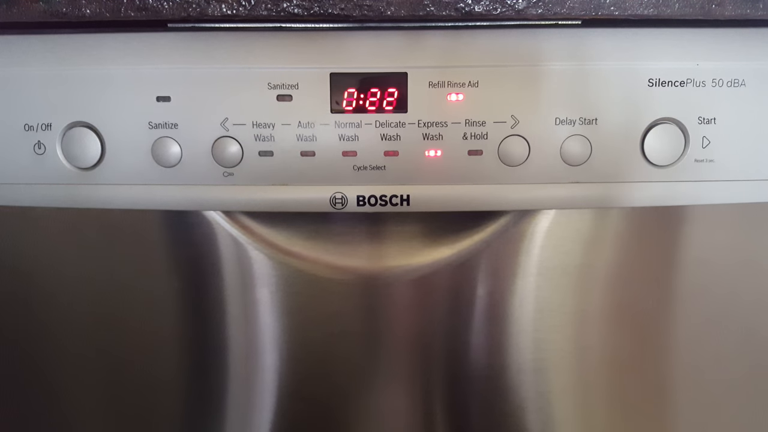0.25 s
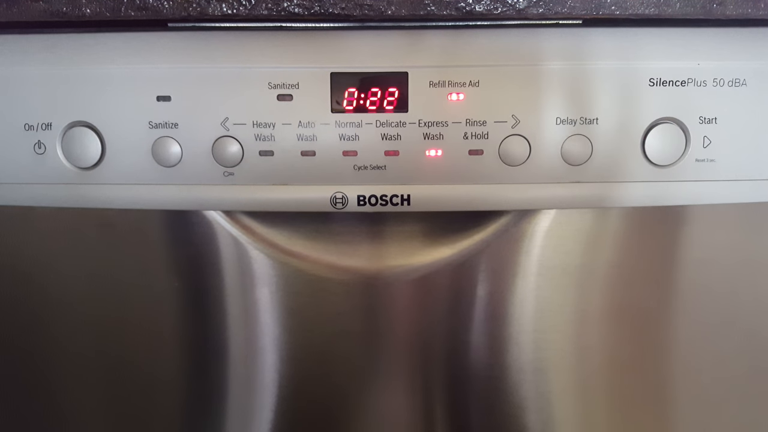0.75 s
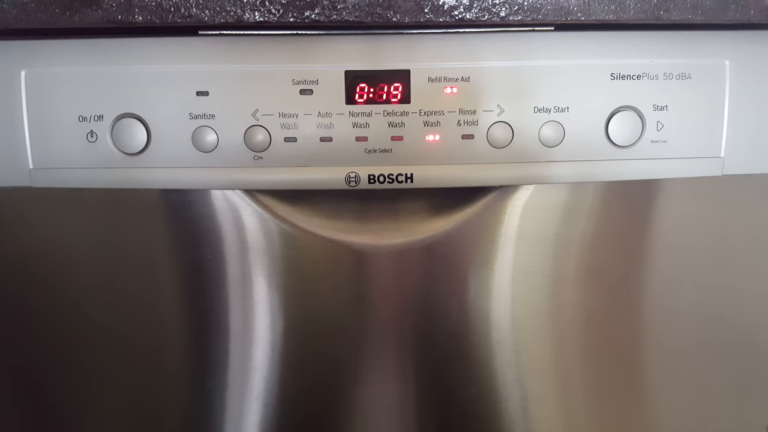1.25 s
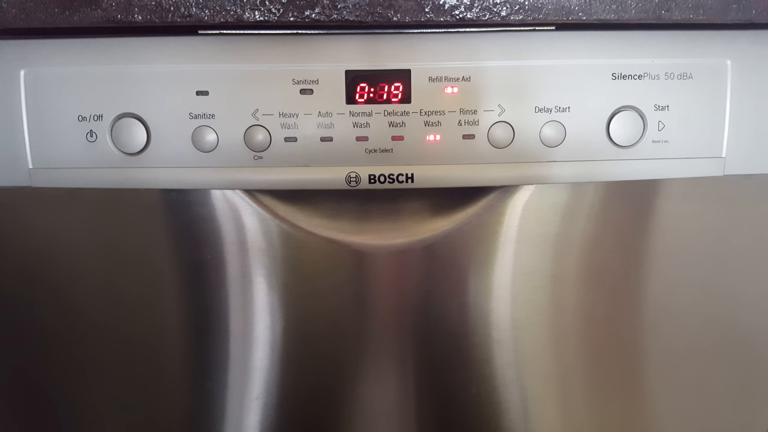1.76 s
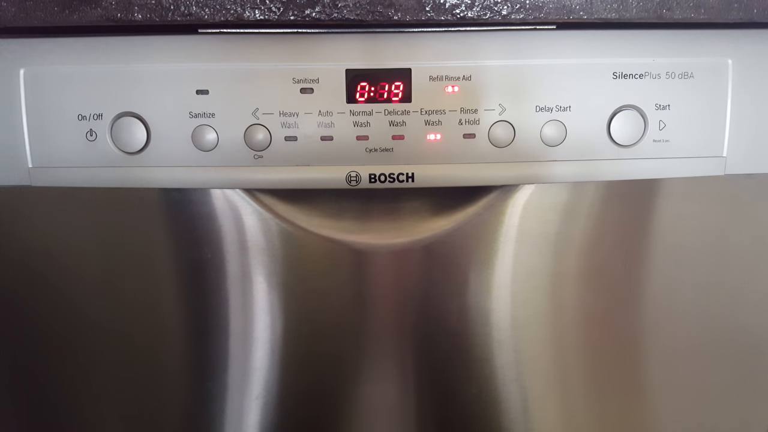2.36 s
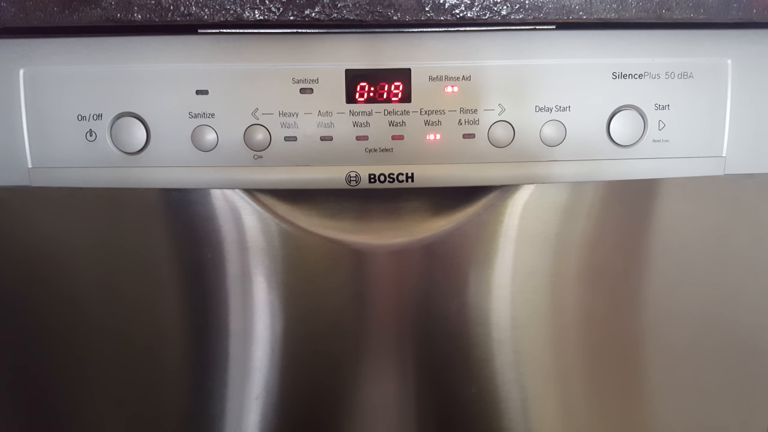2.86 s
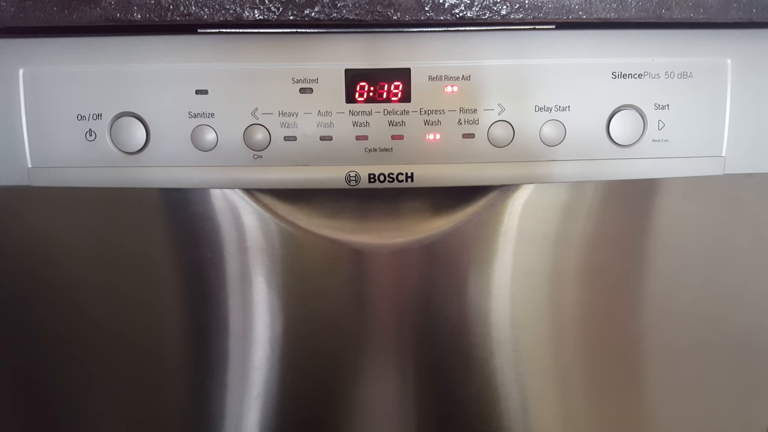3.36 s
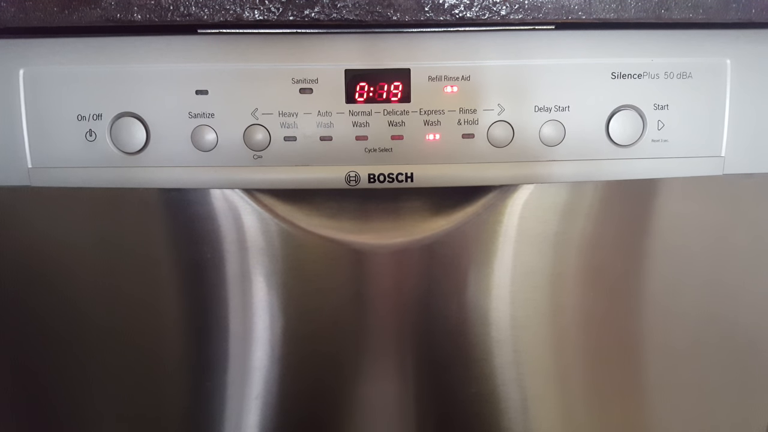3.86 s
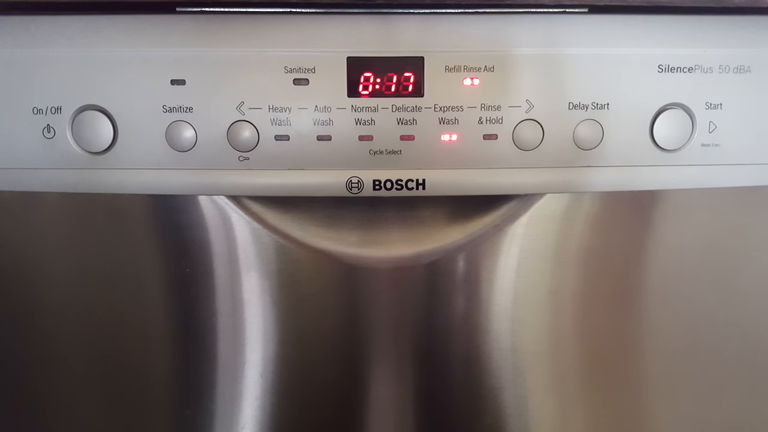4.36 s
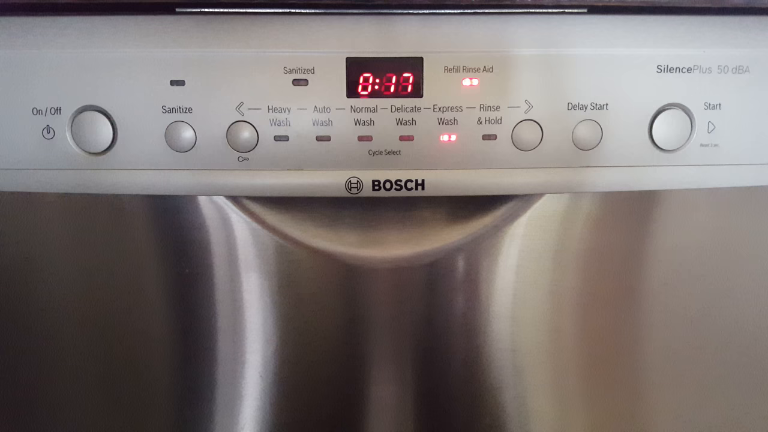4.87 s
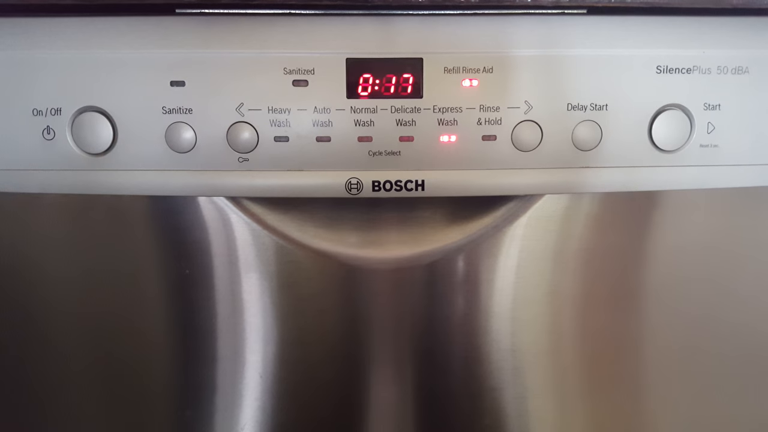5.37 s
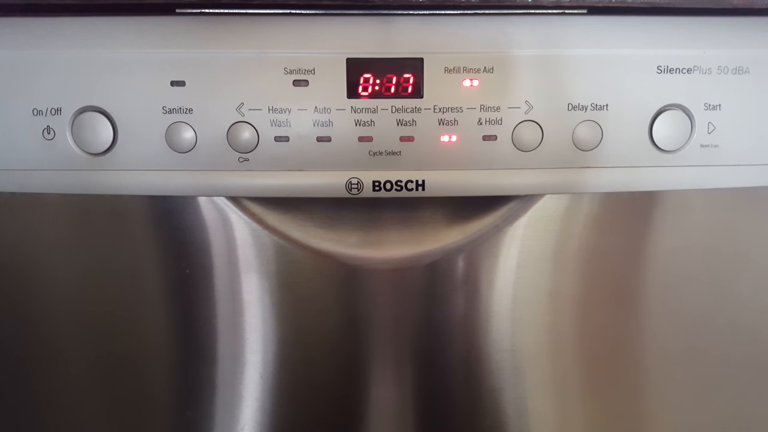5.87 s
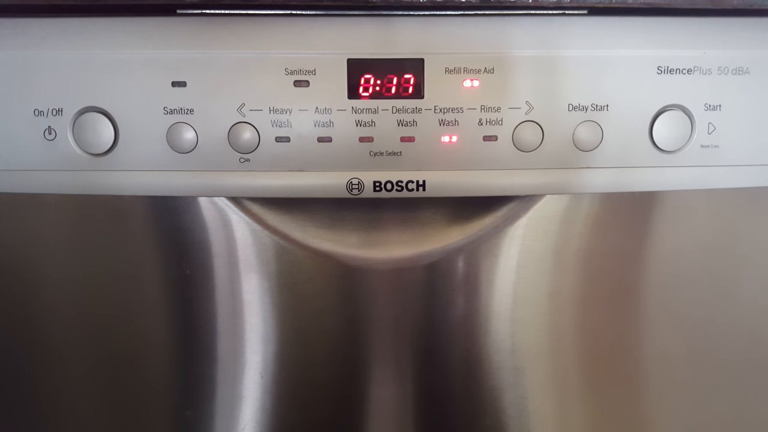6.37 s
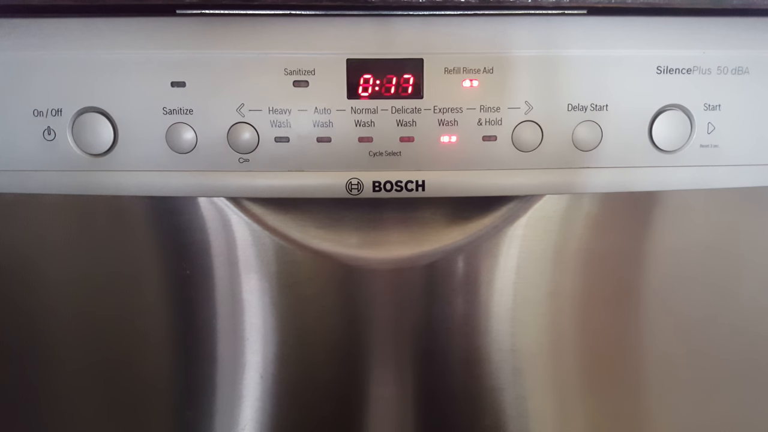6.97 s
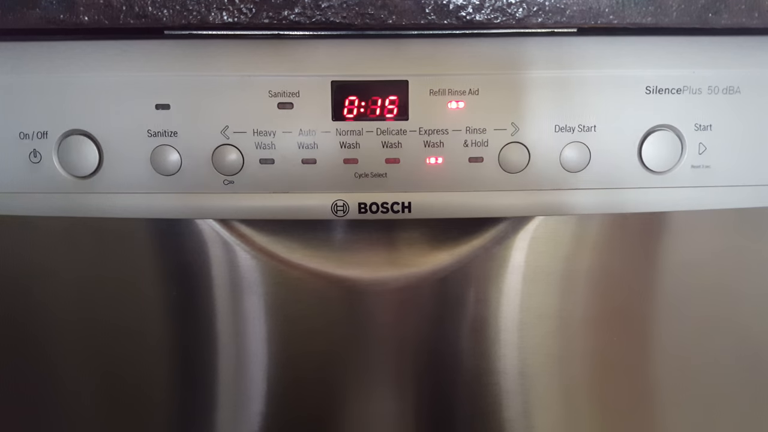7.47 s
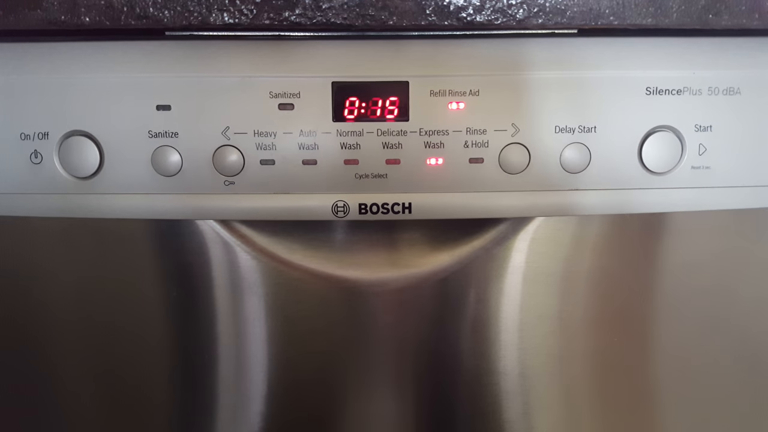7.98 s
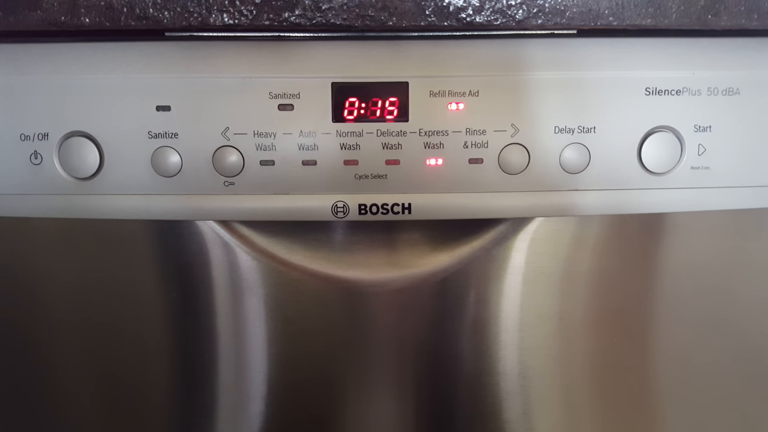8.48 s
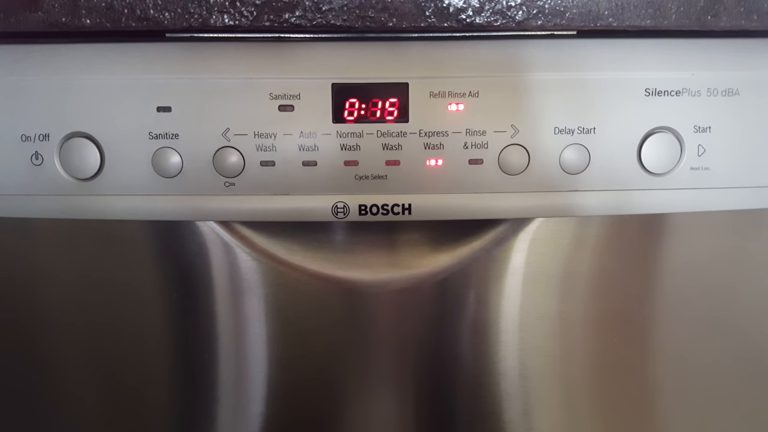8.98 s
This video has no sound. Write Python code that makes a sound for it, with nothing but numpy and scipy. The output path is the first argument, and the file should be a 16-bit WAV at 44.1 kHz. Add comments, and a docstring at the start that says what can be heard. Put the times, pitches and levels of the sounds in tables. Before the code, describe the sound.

A dishwasher runs behind its closed steel door, heard from close by for about nine seconds. A low pump hum and tub rumble continue throughout, swelling gently about once a second with small irregular surges. Inside, water sloshes hollowly and patters down, and single drips tick faintly on dishes. From about 0.5 to 0.9 seconds a jet of spray crosses the door in a cluster of splats and hollow plops, knocking a dish against the rack with a brief ring at the start. More short clusters of splats come at about 2.3 to 2.5 seconds, 5.7 to 6 seconds and 8.9 to 9.1 seconds, with weaker stray splashes between. Tiny dry clicks occur near 1, 4.1 and 7.5 seconds, and a sharper drip near 8.5. A thin hiss and a very faint high whine stay in the background.

```python
"""A low hum and rumble, swelling about once a second: a dishwasher runs behind its closed steel door.
The pump sounds a steady tone, and spray drives the door and tub into forced vibration at their low modes.
Inside, falling water patters, sloshing excites the cavity's resonances and single drips tick on dishes.
Now and then the turning spray arm sweeps a jet across the door in a cluster of splats and hollow plops;
one jet knocks a dish against the rack. A thin hiss, a faint whine and a few dry clicks lie behind."""
import sys
import numpy as np
from scipy import signal
from scipy.io import wavfile
from scipy.ndimage import uniform_filter1d

SR = 44100
rng = np.random.default_rng(int(sys.argv[2]) if len(sys.argv) > 2 else 0)


def unload_audio(sound):
    """Save the sound as a 16-bit wav file, at the path given as the first command line argument."""
    columns = np.transpose(np.atleast_2d(sound))
    # keep every value between -1 and 1, then stretch to whole-number steps
    steps = np.round(np.clip(columns, -1, 1) * 32767)
    wavfile.write(sys.argv[1], SR, steps.astype(np.int16))


N = 406602
TIME = np.arange(N) / SR
CUTOFF_HZ = 15800


def from_db(db):
    """Amplitude ratio of a level in decibels."""
    return 10 ** (np.asarray(db) / 20)


def rms_one(x):
    """Normalisation to unit rms."""
    return x / np.sqrt(np.mean(x ** 2) + 1e-20)


def at_hz(points, hz):
    """Interpolation on a logarithmic frequency axis."""
    known_hz, values = np.transpose(points)
    return np.interp(np.log(hz), np.log(known_hz), values)


def drift(rate_hz):
    """Low-passed noise: a slow random fluctuation of unit rms."""
    step, settle = 40, 2000
    r = np.exp(-2 * np.pi * rate_hz * step / SR)
    white = rng.standard_normal(N // step + settle + 2)
    slow = signal.lfilter([1], [1, -2 * r, r * r], white)[settle:]
    return np.interp(np.arange(N) / step, np.arange(len(slow)), rms_one(slow))


def band(x, low_hz, high_hz):
    """Butterworth band-pass filter."""
    return signal.sosfilt(signal.butter(2, [low_hz, high_hz], "band", fs=SR, output="sos"), x + 1e-18)


def resonate(x, hz, width_hz):
    """Two-pole resonator with unit peak gain."""
    r = np.exp(-np.pi * width_hz / SR)
    feedback = [1, -2 * r * np.cos(2 * np.pi * hz / SR), r * r]
    return signal.lfilter(np.array([1, 0, -1]) * (1 - r * r) / 2, feedback, x + 1e-18)


def fade(x, decay_s):
    """Leaky integration: every impulse decays exponentially."""
    return signal.lfilter([1], [1, -np.exp(-1 / (decay_s * SR))], x + 1e-18)


def follow(x, level_db, smooth_s):
    """Division by the running rms makes a sound follow a given level curve."""
    power = uniform_filter1d(np.mean(x ** 2, axis=0), int(smooth_s * SR) + 1)
    return x / np.sqrt(power + 1e-20) * from_db(level_db)


# Interaural correlation of the sound field: f/Hz, coefficient
CORRELATION = [(30, 0.91), (70, 1), (200, 1), (300, 0.85), (640, 0.53), (1400, -0.15), (3000, -0.16),
               (7000, 0.31), (15000, 0.021)]

def stereo(pair, hz):
    """Partial coherence: two independent signals mix, alike at the ears in the bass, apart above."""
    alike = np.clip(at_hz(CORRELATION, hz), -.99, .99)
    return np.sqrt(1 + alike) * pair[0] + np.sqrt(1 - alike) * pair[1] * [[1], [-1]]


def noise_bands(spectrum):
    """Band powers add: yields (f/Hz, stereo noise) for each band of a spectrum, with unit total power."""
    edges = np.geomspace(20, 16500, 25)
    centres = np.sqrt(edges[:-1] * edges[1:])
    power = from_db(at_hz(spectrum, centres)) ** 2 * np.diff(edges) * (edges[1:] > spectrum[0][0])
    white = rng.standard_normal((2, 2, N))
    for k in np.flatnonzero(power):
        noise = stereo(band(white[k % 2], edges[k], edges[k + 1]), centres[k])
        yield centres[k], noise * (np.sqrt(power[k] / power.sum()) / noise.std())


def driven_modes(modes):
    """Forced vibration: under random excitation each mode sounds as a narrow band of noise."""
    out, white = np.zeros((2, N)), rng.standard_normal((2, 2, N))
    for k, (hz, width, level_db) in enumerate(modes):
        ringing = resonate(white[k % 2], hz, width)
        ringing = stereo(band(ringing, hz - 1.58 * width, hz + 1.48 * width), hz)
        out += ringing * (from_db(level_db) / ringing.std())
    return out


def ping(peak_db, hz, t60, rise_s):
    """Free vibration of one damped mode, with a phase difference between the ears."""
    age = TIME[:int(2 * t60 * SR) + 2]
    apart = np.arccos(at_hz(CORRELATION, hz)) * rng.choice([-.5, .5])
    phase = rng.uniform(0, 2 * np.pi) + np.array([[apart], [-apart]])
    envelope = (1 - np.exp(-age / rise_s)) * from_db(-60 * age / t60)
    return from_db(peak_db) * envelope / envelope.max() * np.sin(2 * np.pi * hz * age + phase)


def tones(lines, waver_db, wander_hz, left_lead_s=0):
    """Sinusoids, slightly modulated in amplitude and frequency by a varying load."""
    out = 0
    for hz, level_db in lines:
        cycles = np.cumsum(hz + wander_hz * drift(7.8)) / SR + hz * left_lead_s * np.array([[1], [0]])
        out = out + np.sqrt(2) * from_db(level_db + waver_db * drift(3.2)) * np.sin(2 * np.pi * cycles)
    return out


# Tones of the pump's drive: f/Hz, level/dB before each ear's gain
DRIVE_TONES = [(9711, -87), (10331, -86.3)]

def drive_whine():
    """Tonal noise of the drive: a thin whine, louder on the left."""
    return tones(DRIVE_TONES, waver_db=1, wander_hz=2) * from_db([[2.5], [-6]])


# Narrow treble bands: start t/s, end t/s, f/Hz, bandwidth/Hz, level/dB
SHEEN_BANDS = [(0, 3.7, 10800, 1200, -76), (1.65, 2.2, 12400, 1400, -75), (4.082, 7.491, 10700, 900, -74.5),
               (7.491, 9.3, 10600, 300, -76), (7.491, 10, 11350, 350, -79)]

def sheen():
    """Gated narrow-band noise changes the colour of the hiss now and then."""
    out = np.zeros((2, N))
    for start, end, hz, width, level_db in SHEEN_BANDS:
        gate = np.clip(np.minimum(TIME - start, end - TIME) / .02, 0, 1)
        noise = band(rng.standard_normal((2, N)), hz - width / 2, hz + width / 2)
        out += gate * from_db(level_db) * rms_one(noise)
    return out


# Broad peaks of the hiss: f/Hz, bandwidth/Hz, relative level/dB
HISS_PEAKS = [(5270, 1000, -78), (8700, 10700, -72.5), (12300, 1700, -78), (14800, 2500, -97)]
# Envelope of the hiss: t/s, level/dB before gain
HISS_ENVELOPE = [(0.0, -68), (1.46, -71.5), (2.13, -67), (2.54, -69.5), (7.98, -70), (8.19, -68),
                 (9.22, -69.5)]

def hiss(gain_db):
    """White noise filtered by broad treble resonances gives a thin hiss."""
    level_db = np.interp(TIME, *np.transpose(HISS_ENVELOPE)) + gain_db + 0.5 * drift(8.4)
    white = rng.standard_normal((2, 2, N))
    peaks = sum(from_db(db) * rms_one(resonate(white[k % 2], hz, width))
                for k, (hz, width, db) in enumerate(HISS_PEAKS))
    return from_db(level_db) * rms_one(peaks)


# Dry clicks: t/s, peak level/dB
CLICK_PEAKS = [(0.952, -30.5), (4.083, -30), (7.4922, -32)]

def clicks(decay_s):
    """Impulses without resonance, identical at both ears."""
    impulses = np.zeros(N)
    for s, peak_db in CLICK_PEAKS:
        impulses[round(s * SR)] = from_db(peak_db)
    return fade(impulses, decay_s)


# Steady modes of the cabinet and, at 298.5 Hz, of the door: f/Hz, bandwidth/Hz, level/dB
STEADY_MODES = [(60.8, 8.8, -58.5), (86, 13, -53.5), (109, 29, -59.5), (298.5, 29.4, -50.5)]

def steady_resonance():
    """The cabinet around the machine resonates steadily in its low modes, and the door steadily in one higher
    mode."""
    return driven_modes(STEADY_MODES)


def patter(per_s, spread_db, decay_s):
    """Shot noise: the power envelope, of mean 1, of many small drops and a few large ones."""
    chance = rng.random((8000, 3))
    when, size, _ = chance[chance[:, 2] < per_s * N / SR / len(chance)].T
    energies = from_db(spread_db * np.minimum(-np.log(size), 5)) ** 2
    power = fade(np.bincount((when * N).astype(int), energies, N), decay_s)
    return power / power.mean()


# Spectrum of falling water: f/Hz, relative density level/dB
WASH_SPECTRUM = [(22, -10), (60, 10), (200, 2.5), (400, 5.5), (700, 0.5), (1150, 3), (1530, 0.5),
                 (2030, -4), (2700, -8.5), (3550, -13.5), (4700, -18), (6200, -24.5), (11000, -26.5),
                 (15500, -58)]

def wash(level_db, drop_share, narrow_share):
    """Impacts of water falling through the racks superpose into a rush; drops stand out in the treble."""
    shower = patter(per_s=800, spread_db=3, decay_s=0.0066)
    out = np.zeros((2, N))
    for hz, noise in noise_bands(WASH_SPECTRUM):
        if hz > 300:
            # drops on small things sound in one band only
            narrow = patter(per_s=130, spread_db=4 + 1.75 * np.log2(hz / 1000), decay_s=0.0063)
            impacts = (1 - narrow_share) * shower + narrow_share * narrow
            noise = noise * np.sqrt(1 - drop_share + drop_share * impacts)
        out += noise
    return from_db(level_db) * rms_one(out)


def tub_echoes(x, echo_db, count):
    """Comb filtering: short reflections between the steel walls make the treble hollow."""
    treble = signal.sosfilt(signal.butter(2, 600, "high", fs=SR, output="sos"), x)
    out = x.copy()
    for k, lag in enumerate((rng.uniform(0.002997, .016, count) * SR).astype(int)):
        out[:, lag:] += (-1) ** k * from_db(echo_db) * treble[:, :-lag]
    return out


# Cavity modes of the wash space: f/Hz, bandwidth/Hz, relative level/dB
CAVITY_MODES = [(347.4, 34, -54), (406.9, 13.1, -52.5), (463, 39, -53), (565.5, 72, -55.5), (710, 65, -59),
                (834.5, 80, -58.5)]
# Strength of the sloshing: t/s, relative level/dB
SLOSH_ENVELOPE = [(0, -0.5), (.45, 0), (.85, 3), (.93, 2), (1.03, -3), (1.41, -.5), (1.56, 1.5),
                  (2.21, -1.5), (2.31, 1.5), (2.52, 0.5), (2.6, 2), (2.75, -4.5), (2.87, 3.5), (2.98, -2),
                  (3.62, -2.5), (4.07, 4), (4.17, -1.5), (4.5, -0.5), (4.85, 0.5), (5.35, -1.5), (5.7, 1.5),
                  (6.08, 0.5), (6.19, -2), (6.6, 0), (7.05, -1), (7.2, 3), (7.5, -1.5), (7.82, 2.5),
                  (8.04, 1.5), (8.18, -2), (8.32, -0.5), (8.42, -2.5), (8.56, 3.5), (8.75, -1), (8.85, 2.5),
                  (9.22, 2.5)]

def sloshing_water():
    """Sloshing excites cavity resonances; the rush of falling water follows it weakly."""
    slosh_db = np.interp(TIME, *np.transpose(SLOSH_ENVELOPE))
    hollow = follow(driven_modes(CAVITY_MODES), -47 + slosh_db, smooth_s=0.12)
    rush = wash(level_db=-50.88 + 0.2 * slosh_db, drop_share=0.42, narrow_share=0.46)
    return hollow + tub_echoes(rush, echo_db=-17, count=5)


def drops(rows, decay_s, relative_width, top_ratio):
    """Each impact (t/s, peak level/dB, f/Hz) is a noise burst through a broad resonance, dull above it."""
    out, age = np.zeros((2, N + SR)), TIME[:SR // 25]
    for s, peak_db, hz in rows:
        splash = rng.standard_normal((2, len(age))) * age * np.exp(-age / decay_s)
        plop = resonate(resonate(splash, hz, hz * relative_width), hz, hz * relative_width)
        lowpass = signal.butter(4, min(hz * top_ratio, CUTOFF_HZ), fs=SR, output="sos")
        plop = signal.sosfilt(lowpass, plop)
        start = round(s * SR)
        out[:, start:start + len(age)] += from_db(peak_db) * plop / np.abs(plop).max(axis=1, keepdims=True)
    return out[:, :N]


def droplets(peak_db, spread_db, low_hz, high_hz, count):
    """Fine droplets tick at random, partly masked by the wash and fainter as their pitch rises."""
    when, size, pitch = rng.random((count, 3)).T
    hz = low_hz * (high_hz / low_hz) ** pitch
    levels_db = peak_db + spread_db * size - 3 * np.log2(hz / low_hz)
    return drops(zip(when * N / SR, levels_db, hz), decay_s=0.0023, relative_width=0.31, top_ratio=1.44)


# Single drops landing on dishes: t/s, peak level/dB, f/Hz
DRIP_IMPACTS = [(.3691, -46, 3100), (.4703, -46, 2600), (1.1767, -49, 3220), (1.4336, -50, 3040),
                (1.8986, -42, 1460), (2.6658, -50, 3500), (2.7312, -51, 4150), (2.867, -50, 7300),
                (2.9018, -50, 3100), (3.03, -53, 5200), (3.755, -55, 8000), (4.0372, -47, 5050),
                (4.4433, -51, 3600), (4.663, -54, 7300), (4.928, -52, 11000), (5.9968, -40, 3000),
                (8.527, -36, 3400)]

def drips():
    """A drop on a dish excites a heavily damped resonance: a pitched tick."""
    return drops(DRIP_IMPACTS, decay_s=0.0014, relative_width=0.25, top_ratio=1.3)


# Modes of a knocked dish: f/Hz, peak level/dB before gain, T60/s
DISH_MODES = [(401, -37.5, 0.67), (535, -32.5, 0.099), (623, -35.5, 0.18), (750, -34, 0.05),
              (1390, -30, 0.024), (1830, -27.5, 0.022), (2760, -30.5, 0.018), (3440, -33, 0.016),
              (5670, -28, 0.0097), (8200, -34.5, 0.014), (11130, -38, .01), (14000, -39, .009)]

def dish_knock(at_s, gain_db):
    """Impact excitation: the strongest jet shoves a dish against the rack and its modes ring down."""
    out, start = np.zeros((2, N)), round(at_s * SR)
    for hz, peak_db, t60 in DISH_MODES:
        mode = ping(peak_db + gain_db, hz, t60, rise_s=0.0001)
        out[:, start:start + mode.shape[1]] += mode
    return out


# Spectrum of a splat: f/Hz, relative density level/dB
SPLAT_SPECTRUM = [(350, -4), (600, -3.5), (850, 0), (1120, -1), (1530, 1.5), (2030, -2), (2700, -9),
                  (3550, -15.5), (4700, -16), (6200, -27.5), (8200, -37), (10800, -25), (15000, -41)]
# Jets striking the door: t/s, level/dB, decay/s, tilt/(dB/octave), plop peak level/dB, plop f/Hz
JET_IMPACTS = [(0.3024, -40.5, 0.0028, 0.5, -52, 1500), (0.518, -38, 0.0022, -1, -33, 1600),
               (0.5222, -35, 0.0022, -4, -31, 1690), (.528, -28.5, 0.0026, 5, -25.5, 1880),
               (0.534, -36.5, 0.0037, 5, -35, 1390), (.6487, -37.5, 0.0048, -0.5, -38, 1500),
               (0.6796, -37.5, 0.0015, 3.5, -30, 1700), (0.6971, -36.5, 0.0032, -2, -27, 1770),
               (0.811, -40, .004, -3, -42, 1530), (0.817, -39, 0.002, 2.5, -31, 1440),
               (0.822, -34, .0016, 2.5, -34, 1600), (0.8278, -44, 0.01, 0, -30, 1410),
               (.937, -43, 0.0034, -9, -36, 1400), (1.147, -49.5, .004, 4.5, -49, 1300),
               (2.271, -40.5, .005, 1, -41, 1600), (2.2944, -40, .002, 3, -28, 1600),
               (2.3112, -41.5, .005, 0, -29, 1700), (2.384, -51, .002, 0, -37, 1600),
               (2.429, -39, 0.0022, 3, -35, 1400), (2.4399, -38, 0.0029, 1, -34, 1400),
               (2.4518, -42, 0.0025, 3.5, -35, 2200), (2.46, -42.5, .006, 3, -43, 1700),
               (2.556, -46.5, 0.0052, 1.5, -47, 1480), (3.737, -48, .001, 5, -45, 3800),
               (4.099, -45, 0.0029, 0, -36, 1400), (4.845, -46, .006, -3, -46, 1900),
               (4.893, -55, .005, 0, -45, 1390), (5.692, -41, .005, 0, -35, 1600),
               (5.7152, -39.5, 0.002, 2, -31, 1540), (5.7380, -36.5, 0.0033, 0.5, -26, 1730),
               (5.847, -37, 0.0057, -0.5, -34, 1600), (5.8674, -38, 0.0037, -5, -37, 1780),
               (5.881, -46, 0.0042, 3, -34, 1650), (5.9716, -36, 0.0039, -3, -26.5, 1960),
               (6.7123, -45.5, 0.0051, 2.5, -40, 1410), (7.166, -47, .005, -2, -44, 1460),
               (8.7021, -47.5, 0.0061, 4.5, -57, 1500), (8.8765, -35.5, 0.0046, -1, -31, 800),
               (8.8953, -37.5, .003, 1, -24.5, 1410), (8.922, -37, 0.0033, -0.5, -29.5, 1720),
               (8.982, -43.5, .0064, -1, -47, 1490), (9.0414, -41, .004, -6, -28.5, 845),
               (9.0453, -42, 0.0063, 0, -27.5, 1410), (9.064, -49, 0.0043, 6.5, -33, 1420),
               (9.073, -50, 0.006, -2, -33, 1600), (9.0882, -50, .002, 6, -35, 1340),
               (9.152, -50, 0.0083, 0, -38, 1440)]

def jet_splats(rise_s, tail_s, drop_share, stray_count):
    """Jets and faint stray splashes break into bursts of drops, which reverberate dully in the tub."""
    strays = [((k + when) / stray_count * TIME[-1], -52.5, 0.0063, 0.6 * tilt)
              for k, (when, tilt) in enumerate(rng.random((stray_count, 2)))]
    spatter = 1 - drop_share + drop_share * patter(per_s=410, spread_db=0.5, decay_s=0.0017)
    out = np.zeros((2, N))
    for hz, noise in noise_bands(SPLAT_SPECTRUM):
        power, octaves = np.zeros(N), np.log2(max(hz, 700) / 1500)
        for s, level_db, decay_s, tilt_db, *_ in [*JET_IMPACTS, *strays]:
            start = round(s * SR)
            age = TIME[:min(SR // 12, N - start)]
            burst = (1 - np.exp(-age / rise_s)) * np.exp(-age / decay_s / 2)
            power[start:start + len(age)] += (burst * from_db(level_db + tilt_db * octaves)) ** 2
        tail = from_db(-3 - 2 * octaves) ** 2 * fade(power, tail_s) / (tail_s * SR)
        out += noise * np.sqrt(power * spatter + tail)
    return out


def jet_plops(count, lag_s, gap_s, loss_db, scatter_octaves, t60_cycles):
    """Damped oscillation: a slug of water slaps the door, then breaks into weaker, scattered slaps."""
    out = np.zeros((2, N + SR))
    for s, *_, peak_db, hz in JET_IMPACTS:
        gaps, pitches = rng.uniform(.4, 1.6, count) * gap_s, rng.uniform(-1, 1, count)
        for k in range(count):
            start = round((s + lag_s + gaps[:k].sum()) * SR)
            slap_hz = hz * 2 ** (scatter_octaves * pitches[k] * (k > 0))
            slap = ping(peak_db - loss_db * k, slap_hz, t60_cycles / slap_hz, rise_s=0.00037)
            out[:, start:start + slap.shape[1]] += slap
    return out[:, :N]


# Surges (+) and lulls (-) of the spray: t/s, half width/s, door level change/dB, tub level change/dB
SPRAY_SURGES = [(.17, 0.024, -7, 1), (.6, .03, -3.5, 2), (1.01, 0.026, -5.5, -3), (1.16, 0.024, -2, 7.5),
                (1.41, .04, 2, 0), (1.71, 0.03, 1.5, -5), (2.01, .055, 3, 2), (2.2, 0.018, -7, -1.5),
                (2.29, 0.02, 1, 4.5), (2.65, 0.022, 7.5, -3), (2.86, 0.035, -1.5, 1),
                (2.82, 0.026, -1.5, -7), (3.08, 0.017, 4, -1), (3.27, .03, -7.5, 1.5), (3.4, 0.025, 3, 6),
                (3.63, .022, -7, -1), (3.72, 0.028, 8.5, -1), (3.85, 0.064, -4, -1.5), (4.04, .03, 5, -5),
                (4.27, 0.05, 2.5, -6), (4.54, .03, -.5, -9), (4.75, 0.028, -8, -.5), (4.87, 0.036, 6, -5),
                (5.06, 0.026, -10, 0.5), (5.27, 0.031, -10, -5), (5.4, .022, -4.5, -0.5),
                (5.77, 0.035, 7, 0.5), (5.86, 0.027, -10, 2.5), (5.97, 0.044, 6.5, -1),
                (6.12, 0.02, -10, .5), (6.27, 0.065, 3.5, -2.5), (6.73, 0.061, 0, 3.5),
                (7.07, 0.016, 5, 2.5), (7.37, 0.035, -7, -0.5), (7.58, 0.031, -4, -15),
                (7.8, .055, -5.5, -.5), (8.05, 0.022, 6.5, -2), (8.23, 0.016, 7, 1),
                (8.49, .04, -2.5, -7.5), (8.6, 0.032, 4, 1), (8.79, .03, -7.5, -1), (8.88, 0.044, 4, 4),
                (9.07, 0.048, -5, 4.5)]

def spray_surges():
    """Amplitude modulation by the spray: Gaussian pulses plus random unrest, in dB, for door and tub."""
    door_db, tub_db = sum(np.outer(dbs, np.exp(-.5 * np.minimum(((TIME - s) / width_s) ** 2, 20)))
                          for s, width_s, *dbs in SPRAY_SURGES)
    return door_db + 0.8 * drift(16), tub_db + 0.73 * drift(16)


# Modes of the tub: f/Hz, bandwidth/Hz, relative level/dB
TUB_MODES = [(155.9, 17.5, -43.5), (187, 41, -47)]

def tub_rumble(level_db):
    """Drumming spray forces the steel tub to vibrate in its broad low modes."""
    return follow(driven_modes(TUB_MODES), level_db, smooth_s=0.12)


# Hum of the pump: f/Hz, relative level/dB
PUMP_TONES = [(258.8, -43)]
# Modes of the door panel: f/Hz, bandwidth/Hz, relative level/dB
DOOR_MODES = [(241.3, 27.8, -51), (260.6, 17.4, -46)]

def door_drone(level_db, swell_s, throb_s):
    """Pump tone and spray-driven door modes superpose, modulated by a slow swell and a faster throb."""
    swell_db = np.cos(2 * np.pi * (TIME - 0.76) / swell_s)  # probably the turning of the spray arm
    throb_db = 0.67 * np.cos(2 * np.pi * (TIME - 0.088) / throb_s)
    pump = tones(PUMP_TONES, waver_db=2.5, wander_hz=2.634, left_lead_s=0.000075)
    return follow(pump + driven_modes(DOOR_MODES), level_db + swell_db + throb_db, smooth_s=0.075)


def scene():
    """Linear superposition of the machine, the water, the impacts and the hiss."""
    door_surge_db, tub_surge_db = spray_surges()
    machine = door_drone(level_db=-39 + door_surge_db, swell_s=1, throb_s=0.29)
    machine += tub_rumble(level_db=-41 + tub_surge_db) + drive_whine()
    water = sloshing_water()
    water += droplets(peak_db=-54.5, spread_db=3.5, low_hz=2570, high_hz=11800, count=80) + drips()
    jets = jet_splats(rise_s=.0006, tail_s=0.02, drop_share=0.46, stray_count=26)
    jets += jet_plops(count=5, lag_s=0.001007, gap_s=.002, loss_db=6.5, scatter_octaves=.25, t60_cycles=8.2)
    knock = dish_knock(at_s=.528, gain_db=0.5)
    background = steady_resonance() + clicks(decay_s=.00005) + hiss(gain_db=2.5) + sheen()
    return background + water + knock + jets + machine


def record(dry):
    """An elliptic low-pass filter cuts the top of the spectrum steeply."""
    return signal.sosfilt(signal.ellip(12, .1, 80, CUTOFF_HZ, fs=SR, output="sos"), dry)


dry = scene()
out = record(dry)
unload_audio(out)
```